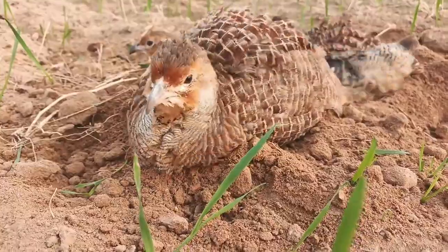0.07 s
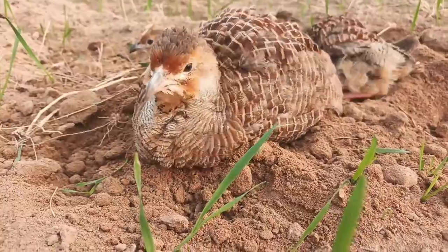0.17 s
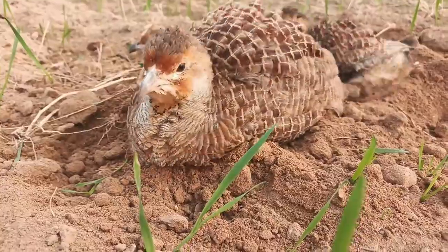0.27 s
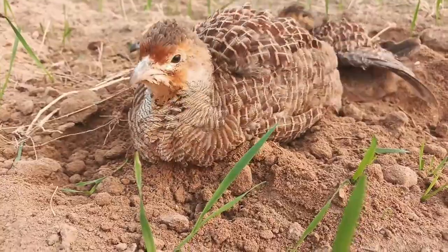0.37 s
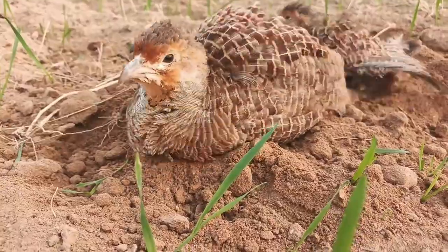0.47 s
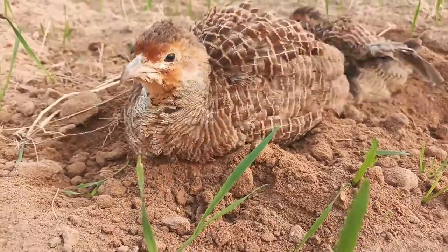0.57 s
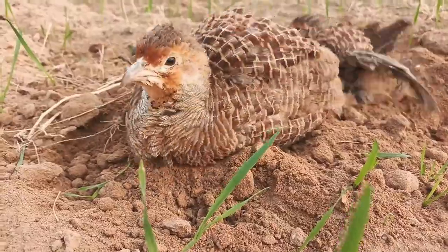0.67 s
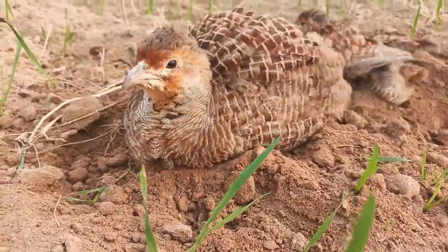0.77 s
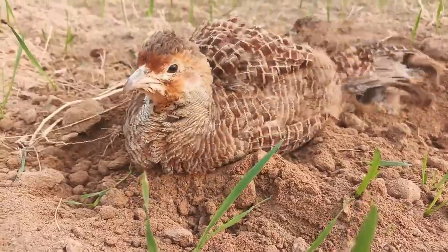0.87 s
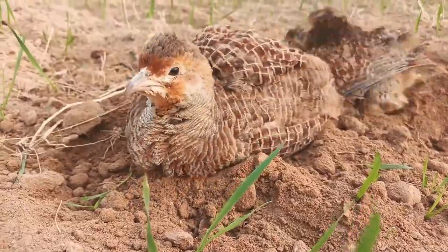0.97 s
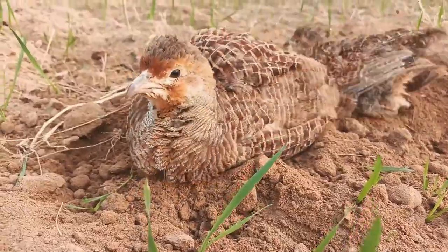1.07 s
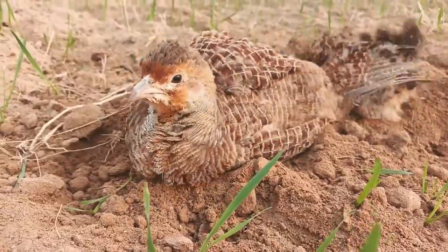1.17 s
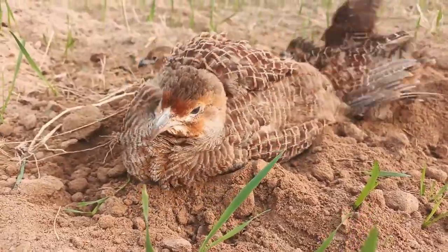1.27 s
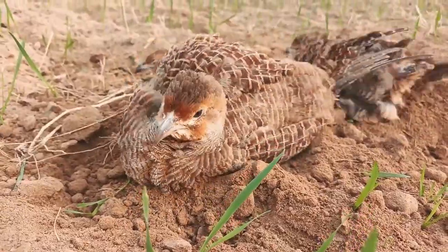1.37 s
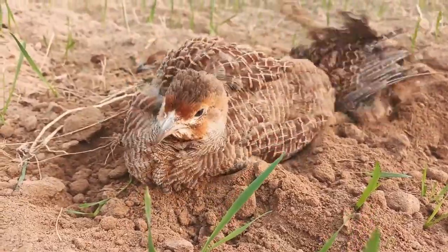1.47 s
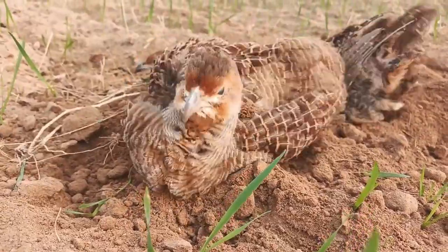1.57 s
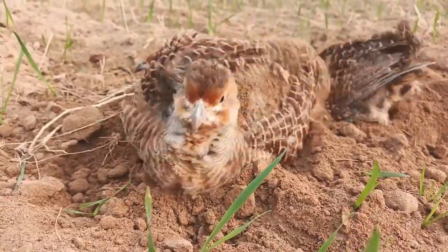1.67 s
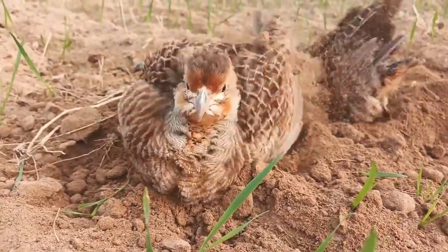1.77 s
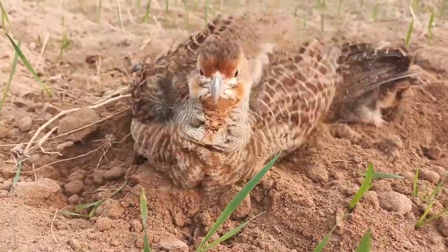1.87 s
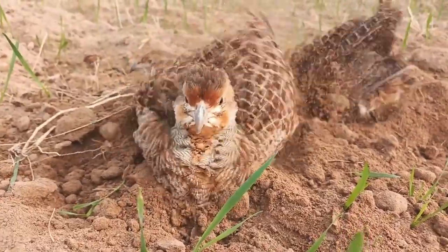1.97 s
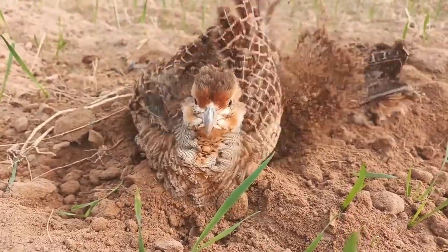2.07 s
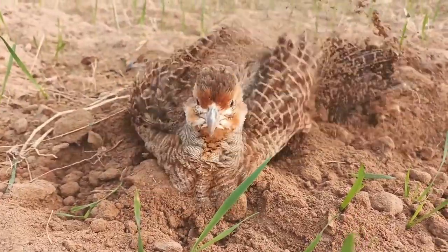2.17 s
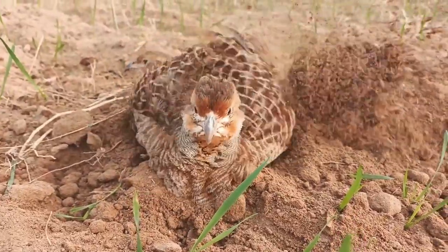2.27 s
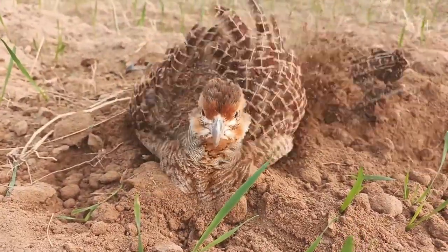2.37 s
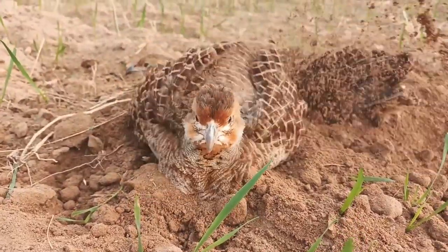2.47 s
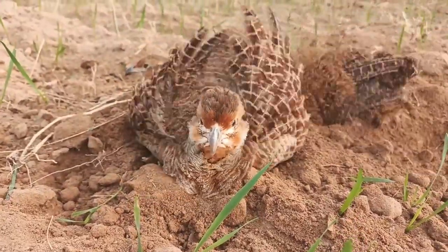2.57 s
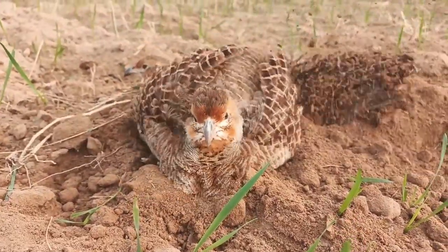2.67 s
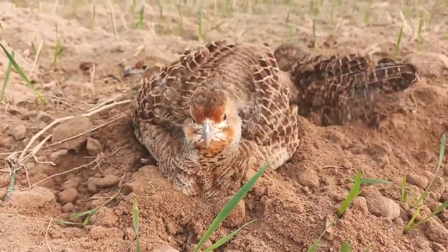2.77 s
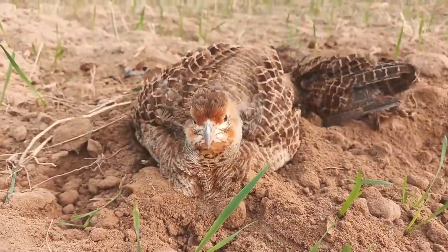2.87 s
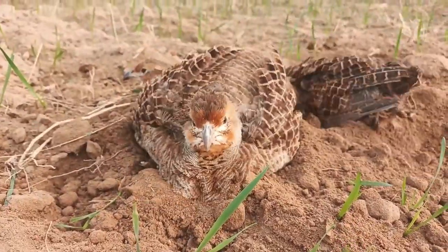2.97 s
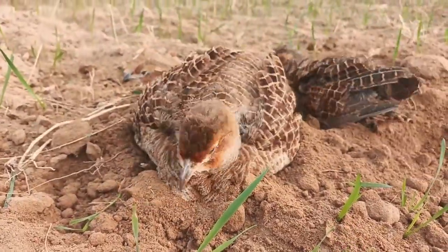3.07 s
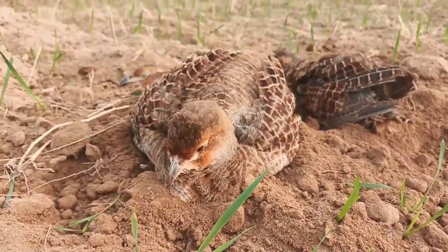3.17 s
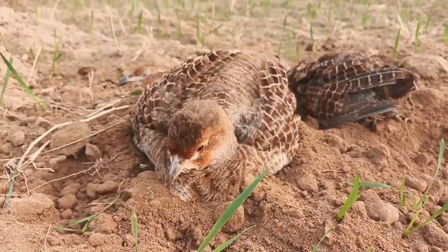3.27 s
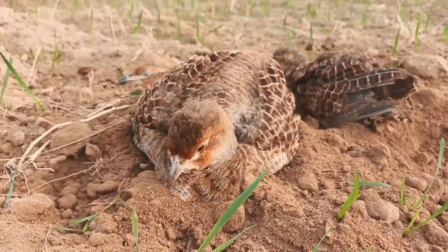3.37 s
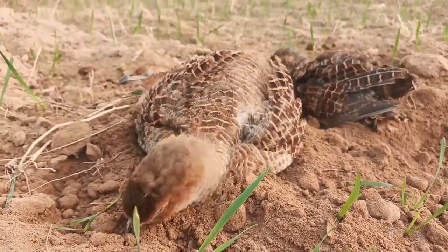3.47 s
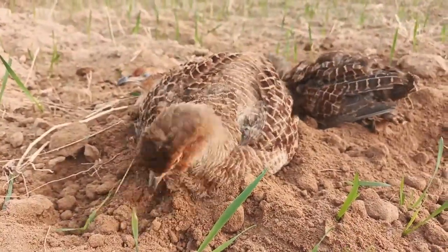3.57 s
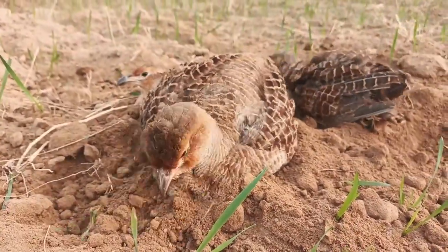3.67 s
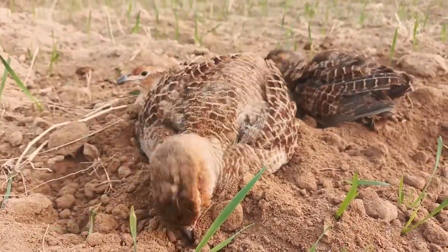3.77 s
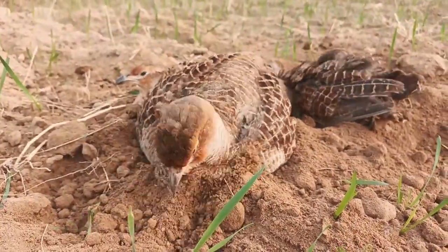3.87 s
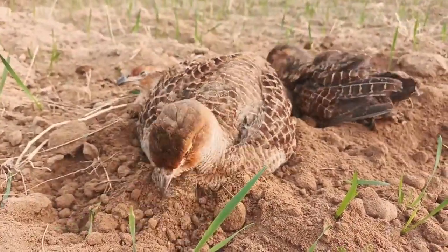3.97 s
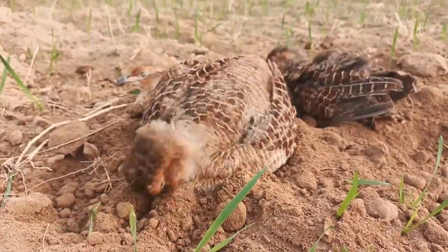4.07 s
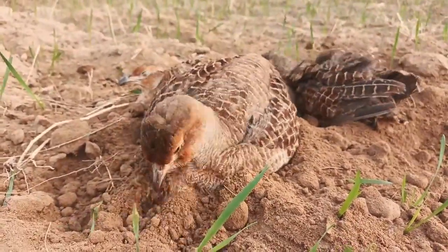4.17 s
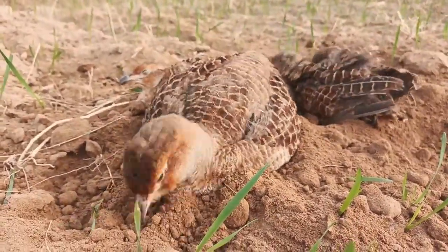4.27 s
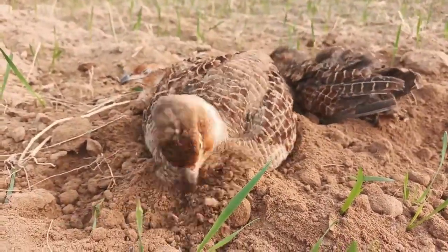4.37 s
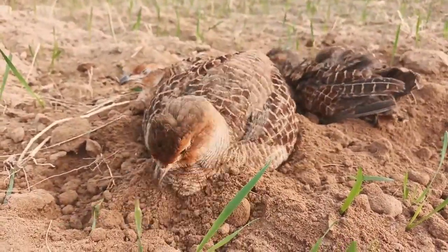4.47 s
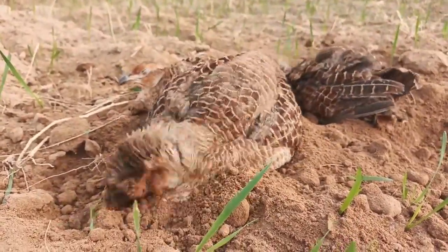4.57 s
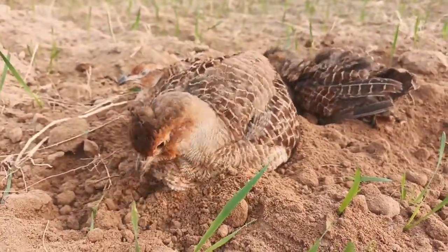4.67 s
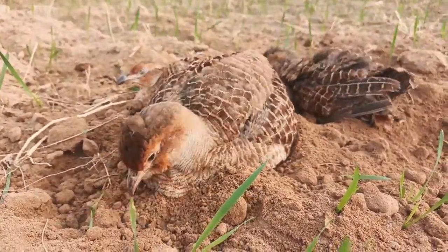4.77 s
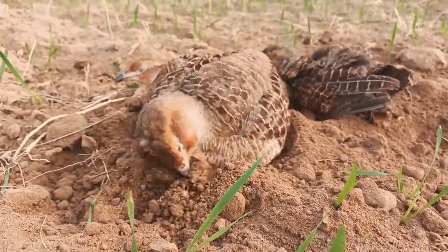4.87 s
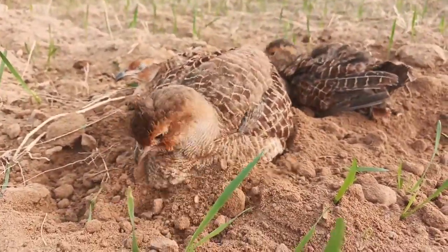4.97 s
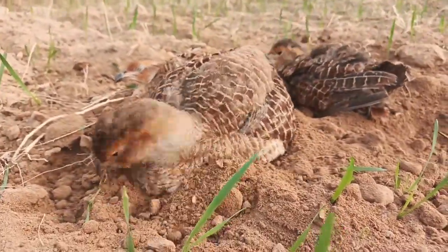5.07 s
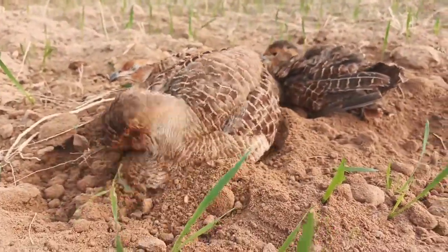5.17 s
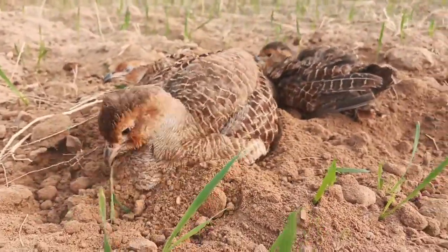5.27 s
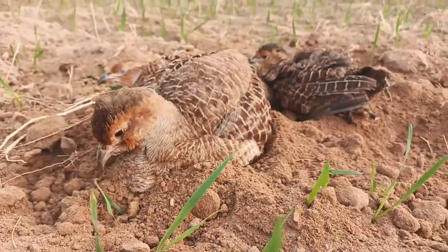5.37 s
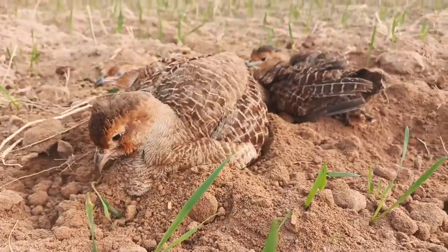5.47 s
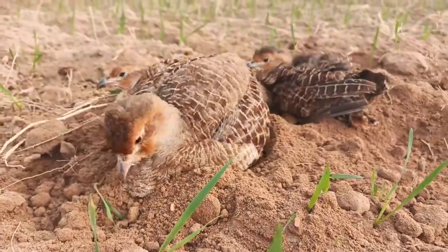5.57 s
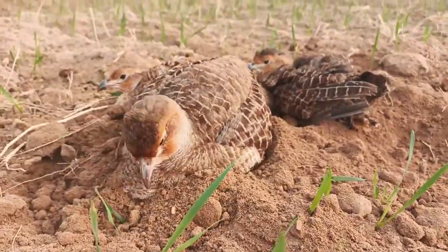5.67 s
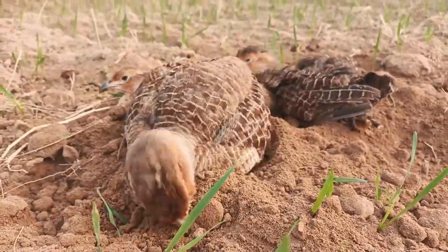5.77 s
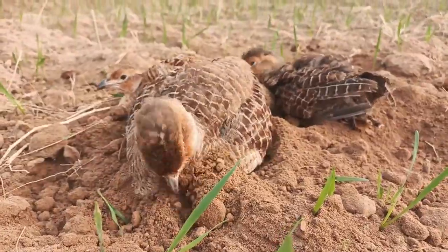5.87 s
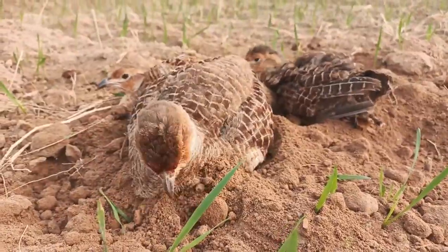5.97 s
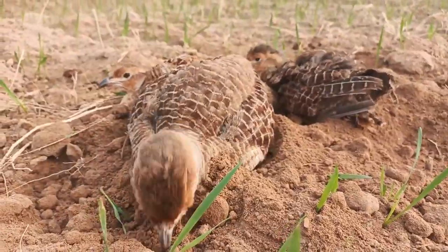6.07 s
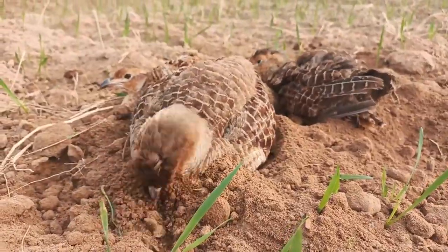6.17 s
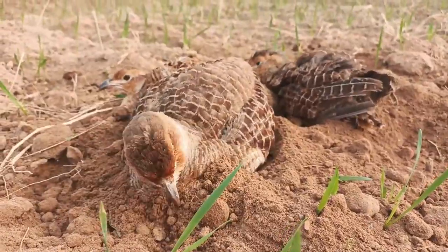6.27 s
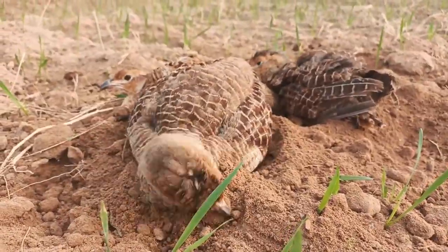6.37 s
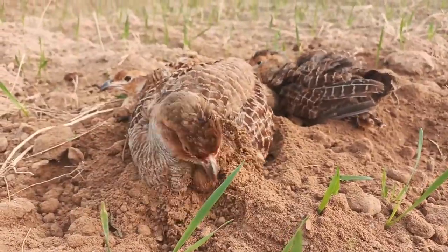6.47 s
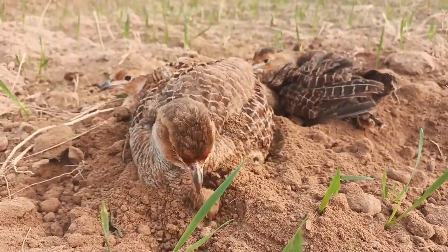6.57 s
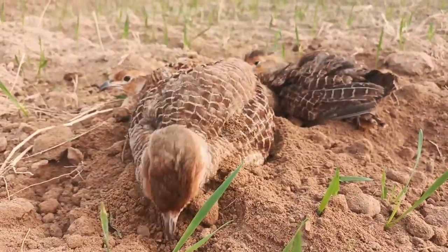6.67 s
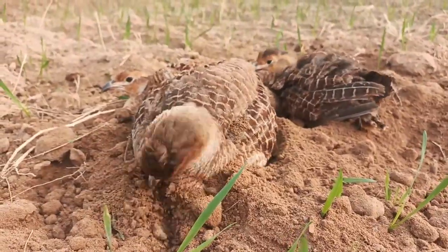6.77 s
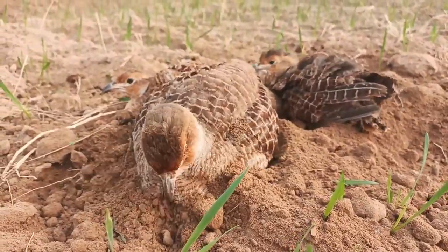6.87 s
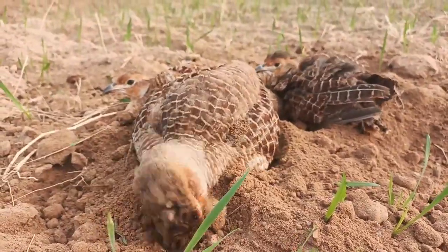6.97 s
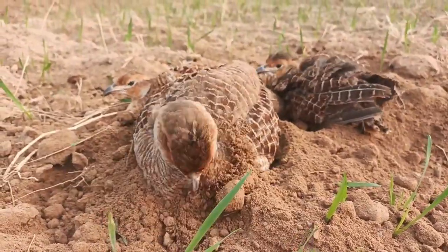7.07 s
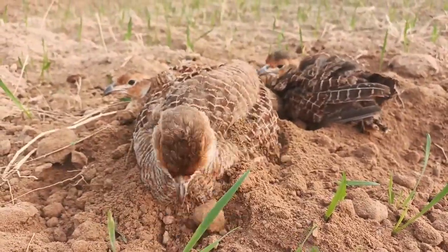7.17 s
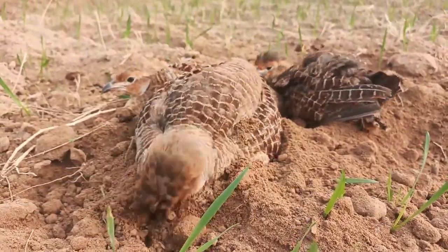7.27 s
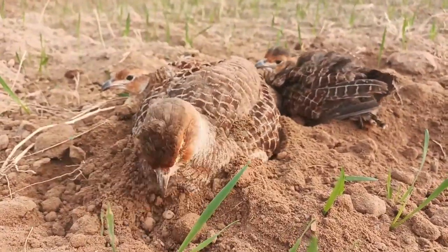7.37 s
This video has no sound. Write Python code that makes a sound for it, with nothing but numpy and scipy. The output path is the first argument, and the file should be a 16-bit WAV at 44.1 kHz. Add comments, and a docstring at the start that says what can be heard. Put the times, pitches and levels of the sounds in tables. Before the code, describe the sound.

An open field heard close up on a phone. From 0 to about 0.9 s, low lumpy wind buffets thump the microphone, over faint, quick soil strokes. From 0.8 s the dust bath becomes clear: wing and foot strokes about every 0.15 s sweep dry soil and fling hissing showers of grit and fine dust over a dull, hollow scrape, with soft thumps on the earth. They peak near 2 s, with a last fling around 2.6 s, then grains tick down. A faint coo and thin distant whistles follow. From 3.5 s it is quiet, with a low murmur, slight wind and short beak rakes and taps every few tenths of a second. A soft falling coo and a far whistle come near 4.6 s, a tiny chip at 5.5 s, and two quick chirps at 5.9-6.1 s. A firmer peck falls at 6.5 s; scratching continues to 7.4 s.

```python
"""Two ground birds dust-bathe in dry soil an arm's length from a phone in an open field: wing and foot strokes
sweep and fling showers of impact grains (grit, dust) over resonant clods, with sine-cycle thumps on the earth.
Then one bird rakes the soil (banded grains, taps) and coos and chirps softly (gliding sines); small birds
whistle further off. Wind buffets the microphone (low noise, short sine bursts) over a field murmur and hum."""
import sys
import numpy as np
from scipy import signal
from scipy.fft import rfft, irfft, next_fast_len
from scipy.io import wavfile
from scipy.ndimage import uniform_filter1d

SR = 44100
rng = np.random.default_rng(int(sys.argv[2]) if len(sys.argv) > 2 else 0)


def store_wav(level_fs):
    """Save 16-bit WAV to argv[1]."""
    pcm = np.round(np.clip(np.atleast_2d(level_fs), -1, 1) * 32767)
    wavfile.write(sys.argv[1], SR, pcm.T.astype(np.int16))


N = 326781

# spectrum shape of flying grit: f/Hz, relative density/dB
GRIT_SPECTRUM = [(590, -50), (1000, -3.5), (1690, -5), (2180, -9), (3840, -1), (4960, -7), (6630, -6),
                 (15100, -6), (16000, -11)]


def amp(db):
    """Gain of a level in dB."""
    return 10 ** (np.asarray(db) / 20)


def unit(x):
    """Scale to rms 1."""
    return x / np.sqrt(np.mean(x ** 2))


def band(x, hz, width_hz):
    """Two-pole resonance, gain 1 at the centre."""
    return signal.lfilter(*signal.iirpeak(hz, hz / width_hz, fs=SR), x)


def butter(x, order, hz, kind):
    """Butterworth filter."""
    return signal.sosfilt(signal.butter(order, hz, kind, fs=SR, output="sos"), x)


def colour(x, points):
    """Shape the spectrum by (f/Hz, level/dB) points on a log axis; rms 1."""
    size = next_fast_len(len(x))
    hz, db = np.transpose(points)
    f = np.arange(size // 2 + 1) * SR / size + 1  # +1 Hz avoids log(0)
    gain = amp(np.interp(np.log(f), np.log(hz), db))
    return unit(irfft(rfft(x, size) * gain, size)[:len(x)])


def walk(rate_hz):
    """Random levels held 1 / rate_hz and slewed twice; rms 1."""
    k = int(SR / rate_hz)
    steps = np.repeat(rng.standard_normal(N // k + 1), k)
    return unit(uniform_filter1d(uniform_filter1d(steps, k), k)[:N])


def grains(per_s, spread_db, n=N):
    """Random impacts: a few large ones among many small."""
    hit, size, sign = rng.random(n), rng.exponential(size=n), rng.standard_normal(n)
    return (hit < per_s / SR) * amp(spread_db * np.minimum(size, 4)) * sign


def patchy(x, depth_db, rate_hz):
    """Grains of different sizes come and go: each third of an octave wanders in level on its own."""
    centres_hz = 1000 * 2 ** np.arange(0, 4.1, 1 / 3)
    return unit(sum(amp(depth_db * walk(rate_hz)) * band(x, hz, .26 * hz) for hz in centres_hz))


def add(out, s, x):
    """Mix x into out from time s."""
    i = int(s * SR)
    out[i:i + len(x)] += x[:N - i]


def swell(t, start, end, rise_s, fall_s):
    """Power 1 from start to end, with rounded flanks that lose 20 dB in rise_s and fall_s."""
    away = np.maximum((start - t) / rise_s, (t - end) / fall_s)
    return amp(-20 * np.clip(away, 0, 9) ** 1.5) ** 2


def knocks(table, sag=0.065, overtone_db=-14):
    """Short sine bursts: a few cycles that swell, die and sag in pitch; high ones are purer."""
    out = np.zeros(N)
    for s, db, hz, cycles in table:
        length = cycles * SR / hz
        u = np.arange(int(length)) / length
        phase = 2 * np.pi * cycles * (u + sag * u * (1 - u))
        overtone = amp(overtone_db) * min(1500 / hz, 1) ** 3
        tone = np.sin(phase) + overtone * np.sin(2 * phase)
        add(out, s, amp(db) * np.sin(np.pi * u ** 0.64) ** 2 * tone)
    return out


def calls(table, overtone_db, patchy_db):
    """Near-sine whistles with a weak second harmonic; moving air makes them come and go."""
    out = np.zeros(N)
    for call in table:
        s, hz, db = np.transpose(call)
        t = np.arange(s[0], s[-1], 1 / SR)
        pitch_hz = uniform_filter1d(np.interp(t, s, hz), size=90)
        phase = 2 * np.pi * np.cumsum(pitch_hz) / SR
        second = amp(overtone_db) * np.minimum(pitch_hz / 900, 1) ** 9  # fades on the lowest notes
        tone = np.sin(phase) + second * np.sin(2 * phase)
        add(out, s[0], np.sqrt(2) * amp(np.interp(t, s, db)) * tone)
    return out * amp(patchy_db * walk(45))


def scatter(x, wet_db, t60_s):
    """Clods, stalks and the birds' own bodies scatter a short diffuse tail."""
    t = np.arange(0, t60_s, 1 / SR)
    tail = rng.standard_normal(len(t)) * amp(-60 * t / t60_s) * (t > .003)
    tail = tail / np.sqrt(np.sum(tail ** 2))
    return x + amp(wet_db) * signal.fftconvolve(x, tail)[:N]


def field():
    """Murmur of the open land and microphone hiss as shaped noise; a faint wavering hum as narrow noise."""
    # murmur and hiss spectrum: f/Hz, relative density/dB
    spectrum = [(88, -30), (150, -6), (275, -8.5), (612, -16.5), (662, -17), (1500, -25.5), (4410, -29),
                (9080, -40.5), (15100, -37.5), (16000, -40.5)]
    # murmur swell: t/s, level offset/dB
    offsets = [(0, 5), (3.0, 1), (3.75, 1.5), (4.0, -0.2), (5.4, -0.5), (7.41, 0)]
    # far hum: f/Hz, width/Hz, level/dB
    hum_hz, hum_width_hz, hum_db = (228, 6.5, -77.5)
    murmur_db = -73.0
    s, offset_db = np.transpose(offsets)
    level_db = murmur_db + walk(11) + np.interp(np.arange(N) / SR, s, offset_db)
    murmur = colour(rng.standard_normal(N), spectrum) * amp(level_db)
    hum = unit(band(rng.standard_normal(N), hum_hz, hum_width_hz))
    return murmur + amp(hum_db) * hum


def wind():
    """Eddies at the microphone port: a low, lumpy rumble under the strongest gusts."""
    # rumble: t/s, level/dB
    rumble_levels = [(0, -60), (.17, -54.5), (.3, -37), (.45, -46), (.74, -48.5), (.92, -63), (1.9, -58),
                     (2.4, -63.5), (3.9, -68), (4.6, -64.5), (5.3, -67), (6.6, -64.5), (7.1, -62.5),
                     (7.41, -70)]
    # strongest gusts: t/s, peak/dB, f/Hz, length/cycles
    buffets = [(.185, -27.5, 73.05, 2.5), (.215, -24, 85.45, 1.6), (.265, -27.5, 125.5, 3.3),
               (.288, -20, 93.4, 2.04), (.31, -33.5, 130, 5), (.345, -25.5, 86, 1.7),
               (.385, -31.5, 113.5, 4.8), (.52, -21.5, 95.5, 5.4), (.6, -31, 68.5, 3.7),
               (.648, -26, 90, 2.6), (.73, -35.5, 67.32, 2.9), (.86, -37.5, 82, 2.5), (1.6, -46, 150, 4.6),
               (1.85, -44, 67.92, 3.562), (2.46, -53, 69.3, 5), (3.35, -47.5, 94, 5.187),
               (3.43, -44.5, 101, 3), (3.47, -46.5, 68, 3.6), (3.535, -47, 88, 4.5),
               (3.575, -43.5, 80, 4.7), (3.68, -48.5, 100.4, 4.1), (4.31, -47, 76, 6.2),
               (4.4, -46, 82, 5.46), (4.485, -44.5, 79.31, 2.882), (7.025, -43.5, 70, 3.2)]
    s, db = np.transpose(rumble_levels)
    eddies = butter(rng.standard_normal(N), 3, [55, 150], "band")
    rumble = unit(unit(eddies) * amp(2.8 * walk(15)))
    rumble = rumble * amp(np.interp(np.arange(N) / SR, s, db))
    return rumble + knocks(buffets, sag=0.015, overtone_db=-16.5)


def glide(row, swell_db):
    """Rows (t/s, f/Hz, level/dB): a bowed slide that swells to its peak and dies."""
    s, length, first_hz, last_hz, bow_hz, db, peak = row
    u = np.linspace(0, 1, 40)
    away = np.maximum((peak - u) / peak, (u - peak) / (1 - peak))
    hz = first_hz + (last_hz - first_hz) * u + 4 * bow_hz * u * (1 - u)
    return np.transpose([s + length * u, hz, db - swell_db * away ** 1.8])


def far_whistles():
    """Small birds further off: almost pure sliding tones."""
    # start/s, length/s, first f/Hz, last f/Hz, mid-slide bow/Hz, peak level/dB, peak place/0-1
    slides = [(2.663, 0.073, 4350, 4050, 0, -83, 0.51), (2.975, .06, 4930, 4650, 60, -81, 0.27),
              (4.675, .09, 3920, 3650, 384, -66.5, 0.54), (4.943, 0.076, 5413, 5100, 30, -84, 0.47),
              (5.03, .07, 4680, 4002, 47, -81.5, 0.8)]
    return calls([glide(row, swell_db=25.5) for row in slides], overtone_db=-38, patchy_db=3.5)


def coo(row):
    """Rows (t/s, f/Hz, level/dB): the pitch drops and settles; the voice is faint while high."""
    drop_s, edge_s = .046, .012
    db_per_100_hz, faintest_db = -8.5, -26  # the note fills out as it settles
    s, length, first_hz, last_hz, db = row
    t = np.arange(0, length, .002)
    above_hz = (first_hz - last_hz) * np.exp(-(t / drop_s) ** 2)
    edge = np.clip(1 - np.minimum(t, length - t) / edge_s, 0, 1)
    faint_db = np.maximum(db_per_100_hz * above_hz / 100, faintest_db)
    return np.transpose([s + t, last_hz + above_hz, db + faint_db - 15 * edge])


def soft_coos():
    """Low falling notes; a weak second harmonic that fades as the pitch drops below 900 Hz."""
    # start/s, length/s, first f/Hz, last f/Hz, settled level/dB
    notes = [(2.633, 0.1, 1147, 880, -64.5), (4.423, .1, 661.9, 613, -77), (4.616, 0.12, 1240, 768, -54.5),
             (7.122, .06, 640, 600, -73.5)]
    return calls([coo(row) for row in notes], overtone_db=-13, patchy_db=2.0)


def chirp(curve):
    """Rows (t/s, f/Hz, level/dB): full voice up to the break, a gap on it, thinner after it."""
    level_1khz_db, tilt_db_per_khz, edge_s = -47, -1.5, 0.0042
    break_hz, break_width_hz, break_db, upper_db = 2210, 225, -24.5, -10.5  # the voice cracks
    s, hz = np.transpose(curve)
    t = np.arange(s[0], s[-1], .001)
    hz = np.interp(t, s, hz)
    db = level_1khz_db + tilt_db_per_khz * (hz / 1000 - 1)
    db = db + upper_db * (np.maximum.accumulate(hz) > break_hz)
    db = db + break_db * np.exp(-((hz - break_hz) / break_width_hz) ** 2)
    edge = np.minimum(t - s[0], s[-1] - t) / edge_s
    return np.transpose([t, hz, db - 20 * np.clip(1 - edge, 0, 1)])


def near_chirps():
    """Quick pitch sweeps of the near bird, almost pure tones."""
    # one pitch curve per chirp: t/s, f/Hz
    curves = [
        [(5.941, 746), (5.946, 790), (5.961, 2000), (5.974, 2740), (5.986, 2900), (6.0, 2787)],
        [(6.05, 880), (6.061, 1760), (6.067, 1257), (6.078, 2280), (6.087, 2760), (6.093, 2660), (6.103, 1690),
         (6.115, 1511)],
    ]
    return calls([chirp(curve) for curve in curves], overtone_db=-35, patchy_db=1.5)


def beak():
    """A rake drags clods (broad mid band, dull thud) and flicks grit (treble); taps and a chip call are bursts."""
    # rakes: start/s, mid-band level/dB, time scale/s, centre f/Hz, treble re mid band/dB
    rakes = [(3.564, -71.5, 0.062, 2000, -7), (3.869, -73.5, .03, 2100, -7),
             (4.134, -66.5, 0.023, 1600, -10), (4.386, -65, 0.049, 2060, -10.5),
             (4.906, -71.5, 0.048, 1990, -5), (5.198, -70.5, .046, 1980, -9),
             (5.858, -69, 0.075, 1500, 1.5), (6.19, -66, 0.052, 1500, -6), (6.494, -71, 0.073, 1400, -1.5),
             (6.793, -68.5, .06, 1780, -12), (7.068, -70, 0.053, 2200, -1.5), (7.35, -68, 0.051, 1580, -8)]
    # taps on clods, and one very short high chip call at 5.497 s: t/s, peak/dB, f/Hz
    taps_and_chip = [(2.617, -48.5, 1420), (3.874, -62.5, 2060), (4.141, -57.5, 1070), (4.398, -50, 2137),
                     (4.412, -60, 2180), (4.914, -62, 1020), (4.932, -58, 2080), (5.497, -57.5, 3605),
                     (5.88, -55, 360.5), (6.209, -54, 830), (6.4685, -39, 864), (6.513, -54, 600),
                     (6.808, -44.5, 980), (7.356, -60, 1047)]
    flick_hz, flick_width_hz, thud_db = 8500, 10000, 3.5
    base_cycles, ring_s = 3, 0.0024  # high ones, as of small clods, ring a few cycles more
    scrape = np.zeros(N)
    crumbs = patchy(grains(3000, 3.7), depth_db=7.0, rate_hz=40)
    treble = unit(butter(band(crumbs, flick_hz, flick_width_hz), 2, 4500, "high"))
    thud = unit(band(grains(900, 2.5), 330, 361.7))
    for s, db, length, hz, treble_db in rakes:
        u = np.arange(0, 2, 1 / (length * SR))
        near = slice(int(s * SR), int(s * SR) + len(u))
        mid = unit(band(band(crumbs[near], hz, 2200), hz, 2200))
        sound = mid + amp(treble_db) * unit(treble[near]) + amp(thud_db) * thud[near]
        envelope = np.minimum(u / 0.31, 1) * np.exp(-1.5 * u ** 2)
        add(scrape, s, amp(db) * sound * envelope[:len(sound)])
    bursts = [(s, db, hz, base_cycles + ring_s * hz) for s, db, hz in taps_and_chip]
    return scrape + knocks(bursts, overtone_db=-13)


def ticks():
    """A lone grain is a short burst of noise round its own centre; stray grit trickles down after the bath."""
    # grains landing close by: t/s, peak/dB, centre f/Hz, width/centre (width held to 500-16000 Hz)
    landings = [(2.799, -41.5, 8000, 1.9), (2.831, -34.5, 4940, 4.4), (2.879, -50, 9000, 1.2),
                (4.934, -53, 4971, 1.6), (5.339, -52.5, 7000, 1.977), (5.807, -50.5, 11000, .3),
                (5.817, -48.5, 12000, 1.5), (5.866, -56, 10400, .9), (5.914, -48.5, 9875, 0.17),
                (6.278, -67, 10000, 1.094), (6.564, -64.5, 10000, 0.447)]
    trickle_start_s, trickle_db, trickle_fall_db_per_s = 2.7, -70, 30.5
    out, t = np.zeros(N), np.arange(512) / SR
    for s, db, hz, spread in landings:
        decay = np.exp(-t / .0004) + .12 * np.exp(-t / .004)
        burst = (t == 0) * 3 + rng.standard_normal(512) * decay
        width_hz = np.clip(spread * hz, 500, 16000)
        click = band(band(burst, hz, width_hz), hz, width_hz)
        add(out, s, amp(db) * click / np.abs(click).max())
    since = np.arange(N) / SR - trickle_start_s
    trickle = colour(grains(280, 1.6) + 0.1083 * rng.standard_normal(N), GRIT_SPECTRUM)
    return out + trickle * (since > 0) * amp(trickle_db - trickle_fall_db_per_s * since)


def stroke_powers():
    """Power of earth, grit and dust: each stroke sweeps and flings; overlapping powers add."""
    # wing and foot strokes: start/s, fling/s, end/s, then levels ahead of the layer trims in bath():
    # dust sweep/dB, dust fling/dB, earth sweep/dB, grit re dust/dB
    strokes = [(0.047, 0.044, 0.052, -79, -67, -87, -4), (0.084, 0.083, 0.125, -70, -66, -61, -3),
               (0.198, 0.222, 0.257, -73, -76, -64, -1), (0.263, 0.292, 0.29, -81, -72, -58, 5),
               (0.347, 0.34, 0.338, -64, -69, -56, -6), (0.387, 0.388, 0.442, -68, -60, -55, 0),
               (0.488, 0.53, 0.594, -72, -65, -60, -4), (0.647, 0.709, 0.717, -67, -60, -62, -4),
               (0.797, 0.806, 0.884, -59, -55, -56, -5), (0.966, 1.012, 1.038, -56, -48, -55, -4),
               (1.109, 1.122, 1.184, -55, -55, -50, -3), (1.281, 1.33, 1.366, -53, -47, -55, -4),
               (1.442, 1.499, 1.521, -52, -44, -56, -4), (1.609, 1.652, 1.703, -50, -46, -52, -3),
               (1.779, 1.824, 1.839, -49, -49, -49, -1), (1.901, 1.9, 1.965, -57, -60, -50, 1),
               (1.964, 1.988, 2.028, -45, -39, -51, 0), (2.088, 2.137, 2.153, -50, -47, -52, 1),
               (2.257, 2.264, 2.301, -49, -52, -53, 1), (2.411, 2.423, 2.46, -58, -53, -61, 1),
               (2.57, 2.61, 2.665, -71, -54, -68, 2), (2.727, 2.799, 2.847, -70, -70, -74, -3)]
    sweep_rise_s, sweep_fall_s, fling_rise_s, fling_fall_s = .031, .072, .022, .047  # per first 20 dB
    earth_lead_s, earth_fling_db = 0.0026, -3  # clods move before the spray, and share less of the fling
    t = np.arange(N) / SR
    power = np.zeros((3, N))
    for start, fling, end, sweep_db, fling_db, earth_db, coarse_db in strokes:
        near = slice(max(int((start - .2) * SR), 0), int((end + .3) * SR))
        late, early = t[near], t[near] + earth_lead_s
        sweep, earth_sweep = [swell(u, start, end, sweep_rise_s, sweep_fall_s) for u in (late, early)]
        flung, earth_flung = [swell(u, fling, fling, fling_rise_s, fling_fall_s) for u in (late, early)]
        spray = amp(sweep_db) ** 2 * sweep + amp(fling_db) ** 2 * flung
        fling_share = amp(fling_db - sweep_db + earth_fling_db) ** 2
        scrape = amp(earth_db) ** 2 * (earth_sweep + fling_share * earth_flung)
        power[:, near] += [scrape, spray * amp(coarse_db) ** 2, spray]
    return power


def bath():
    """Strokes throw a shower of coarse grit and fine dust over a dull scrape of clods and thump the earth."""
    # hollow in the soil: f/Hz, width/Hz, relative level/dB
    hollow = [(304, 253, -1), (395, 235, -0.5), (600, 202, 1.5), (820, 300, -5.5), (1354, 600, -18.5)]
    # wing thumps on the earth: t/s, peak/dB, f/Hz
    thumps = [(0.286, -55, 510), (0.421, -44, 319), (0.802, -39, 464), (0.867, -43, 600),
              (1.121, -45, 302.6), (1.187, -40, 442), (1.622, -36.5, 533), (1.787, -37, 377),
              (1.814, -31.5, 603), (1.852, -39.5, 458), (1.955, -34, 527.6), (2.074, -31, 330.8),
              (2.163, -40, 610), (2.397, -46.5, 525)]
    split_hz, thump_cycles = 6000, 5.04
    impacts = grains(7000, 1.66) + 0.36 * rng.standard_normal(N)
    shower = colour(patchy(impacts, depth_db=3.0, rate_hz=30), GRIT_SPECTRUM)
    grit = butter(shower, 4, split_hz, "low")
    dust = butter(shower, 4, split_hz, "high")
    clods = grains(1200, 2.44) + 0.12 * rng.standard_normal(N)
    earth = np.zeros(N)
    for k, (hz, width_hz, db) in enumerate(hollow):
        mode = band(band(clods, hz, width_hz), hz, width_hz)
        earth += (-1) ** k * amp(db + 3.5 * walk(25)) * mode  # neighbours in opposite sign
    layers = [amp(1.0) * unit(earth),
              amp(-0.5 + 1.63 * walk(70)) * unit(grit),
              amp(-0.3 + 2.55 * walk(70)) * unit(dust)]
    sprays = np.sum(layers * np.sqrt(stroke_powers()), axis=0)
    return sprays + knocks([(s, db, hz, thump_cycles) for s, db, hz in thumps])


def scene():
    """All sources, heard by one microphone."""
    voices = far_whistles() + soft_coos() + near_chirps()
    birds = scatter(voices + beak(), wet_db=-14.5, t60_s=0.09167)
    return (field() + wind() + birds + ticks() + bath())[None]


def record(dry):
    """The phone drops the deepest bass and cuts the top."""
    top_hz = 15870
    dry = butter(dry, 2, 42, "high")
    return signal.sosfilt(signal.ellip(10, .2, 70, top_hz, fs=SR, output="sos"), dry)


dry = scene()
out = record(dry)
store_wav(out)
```